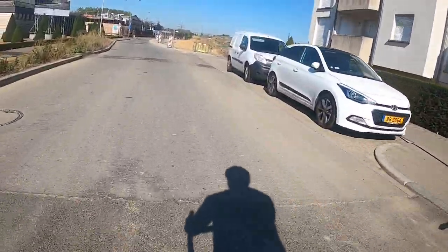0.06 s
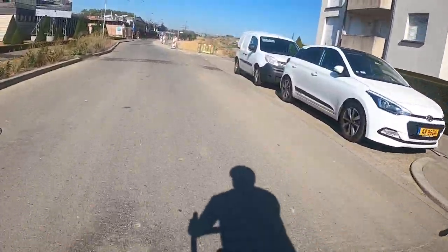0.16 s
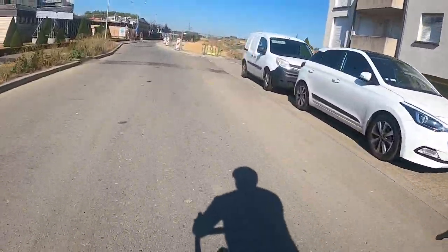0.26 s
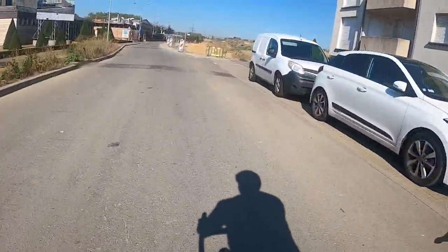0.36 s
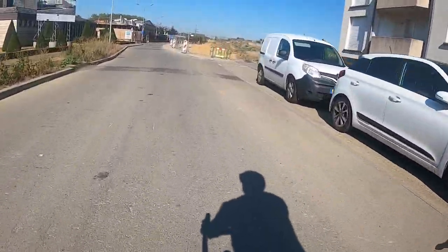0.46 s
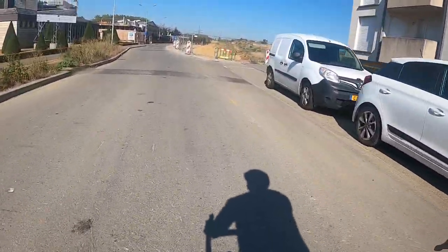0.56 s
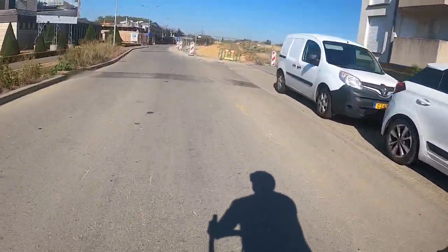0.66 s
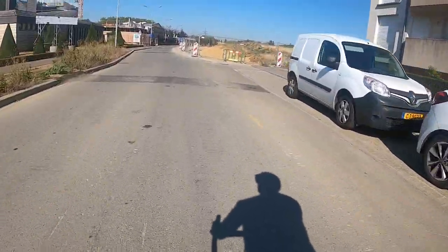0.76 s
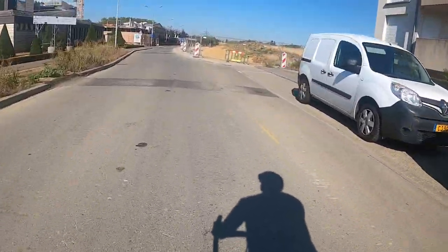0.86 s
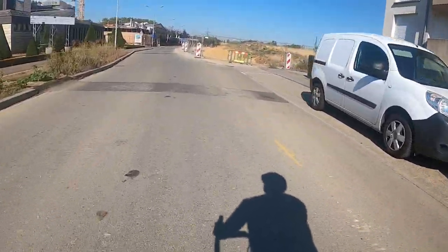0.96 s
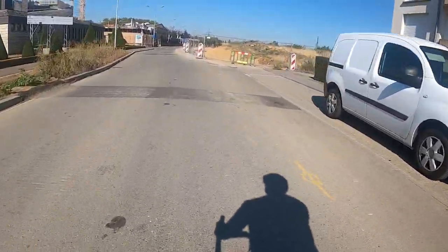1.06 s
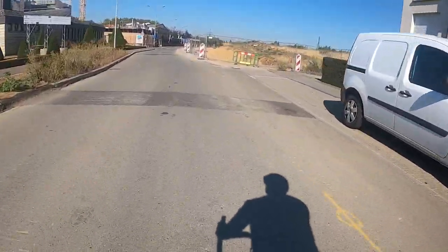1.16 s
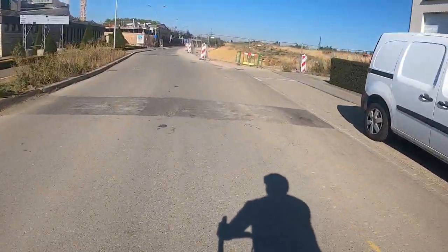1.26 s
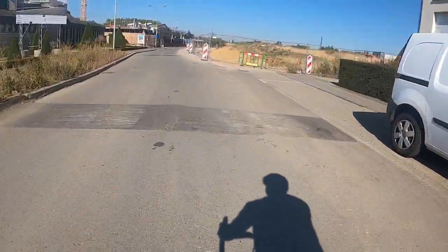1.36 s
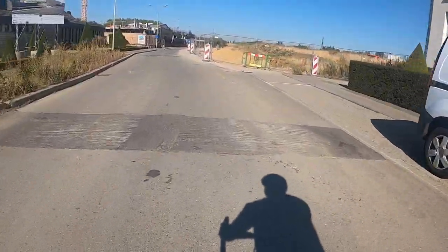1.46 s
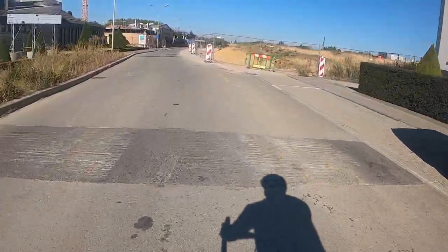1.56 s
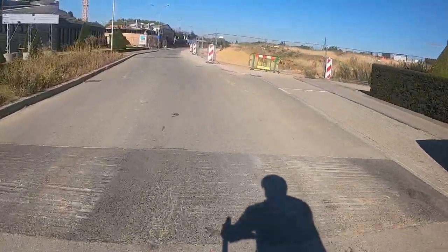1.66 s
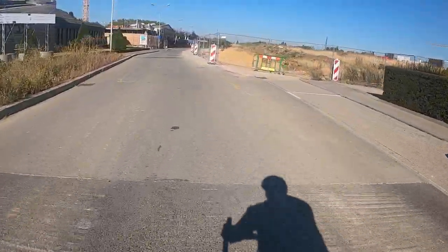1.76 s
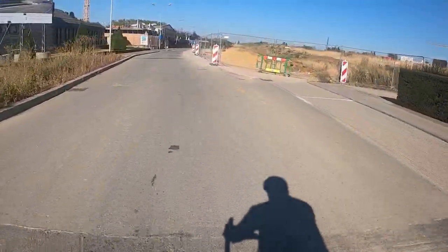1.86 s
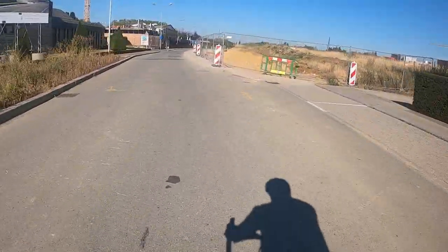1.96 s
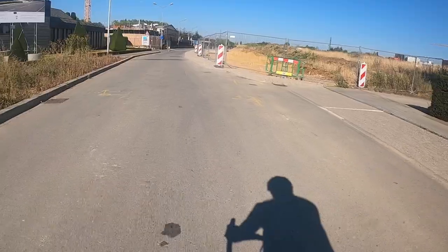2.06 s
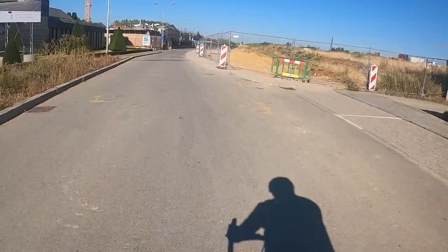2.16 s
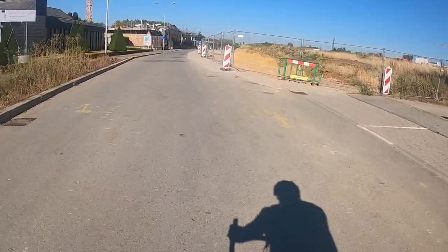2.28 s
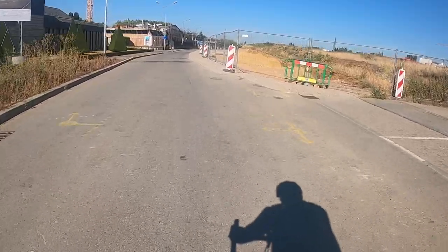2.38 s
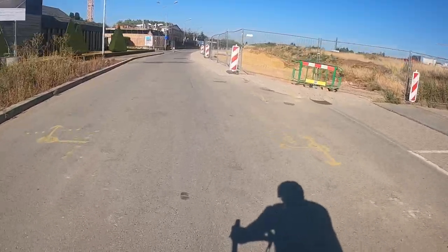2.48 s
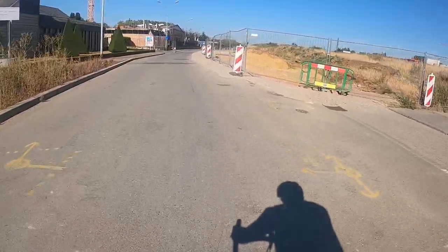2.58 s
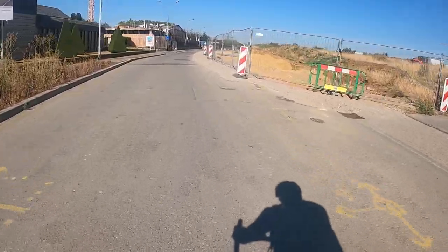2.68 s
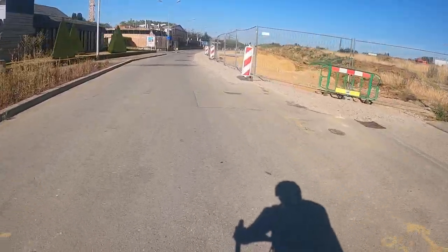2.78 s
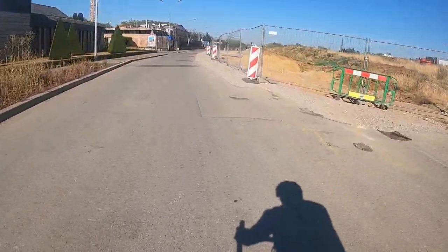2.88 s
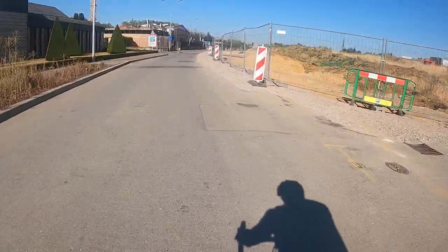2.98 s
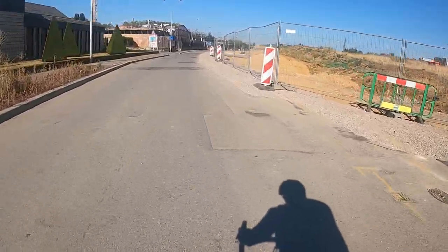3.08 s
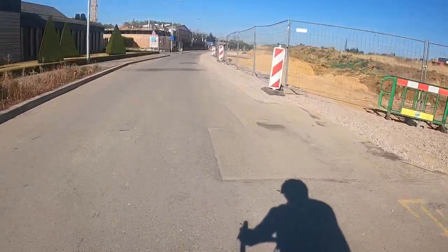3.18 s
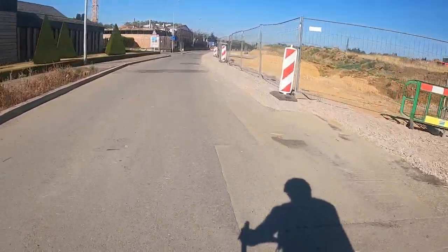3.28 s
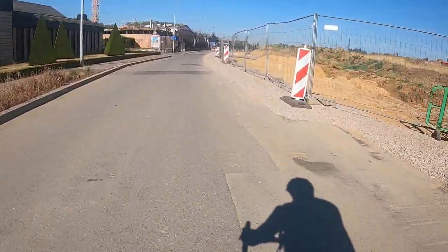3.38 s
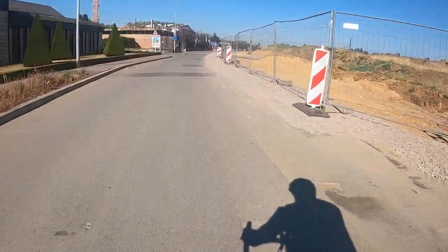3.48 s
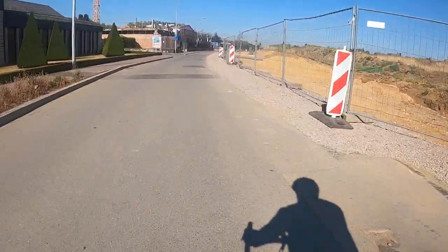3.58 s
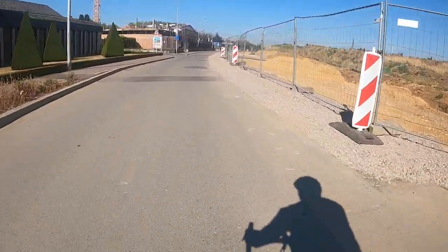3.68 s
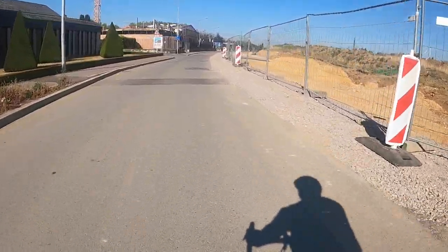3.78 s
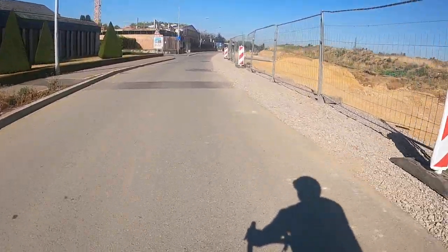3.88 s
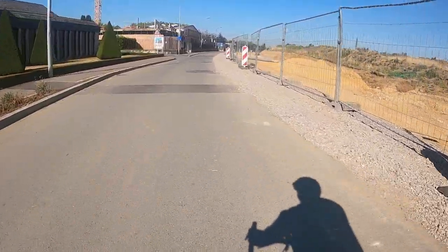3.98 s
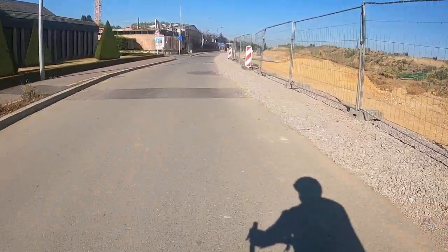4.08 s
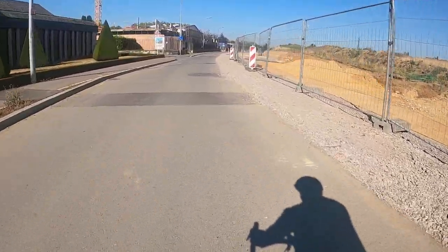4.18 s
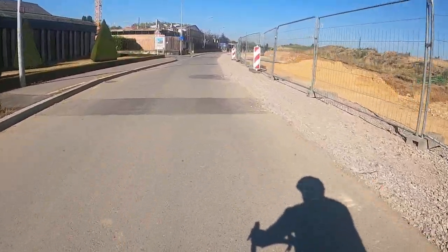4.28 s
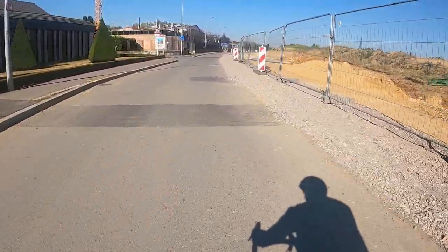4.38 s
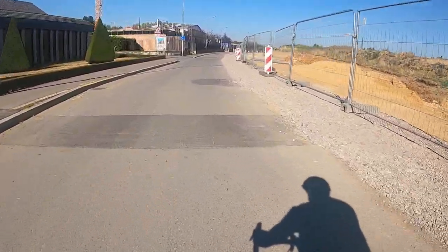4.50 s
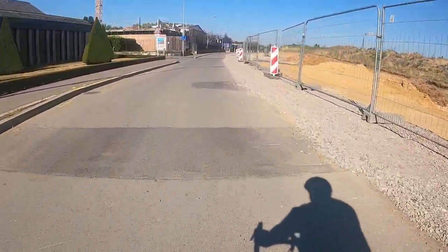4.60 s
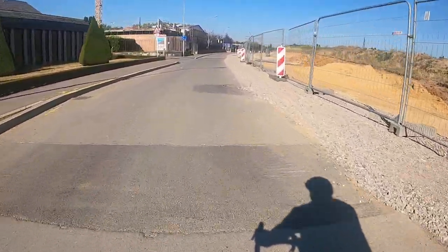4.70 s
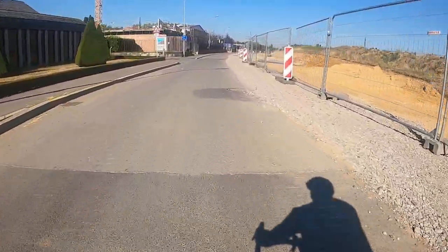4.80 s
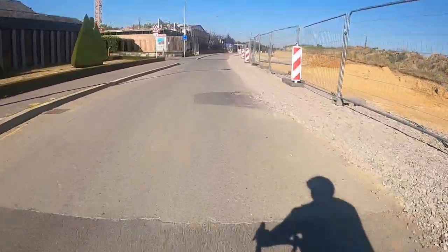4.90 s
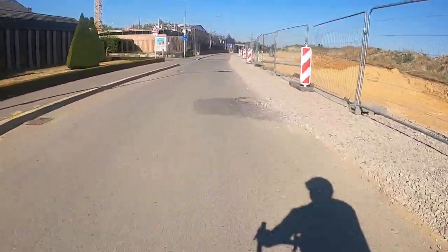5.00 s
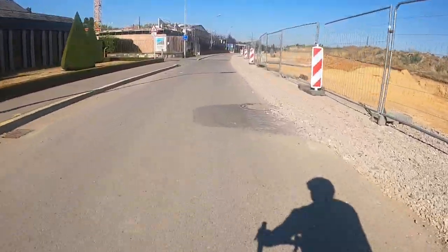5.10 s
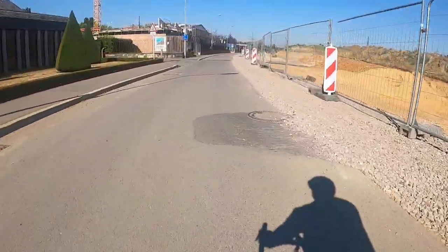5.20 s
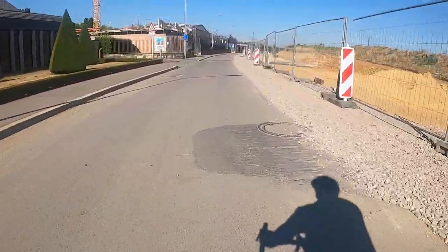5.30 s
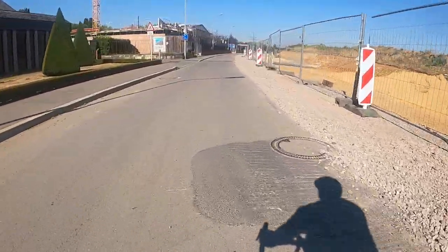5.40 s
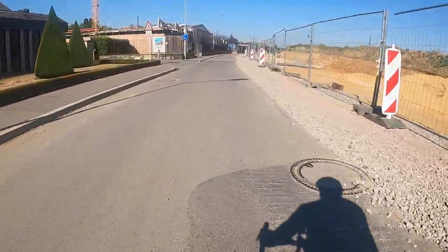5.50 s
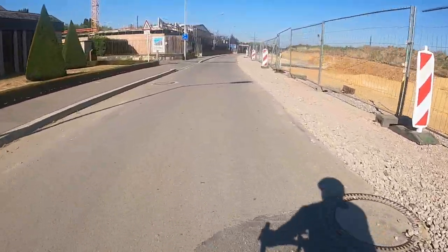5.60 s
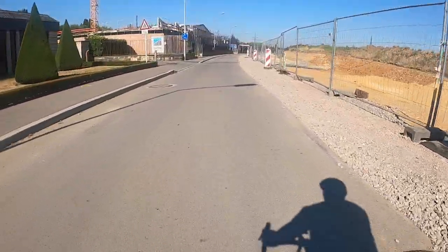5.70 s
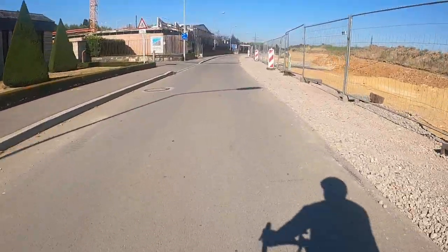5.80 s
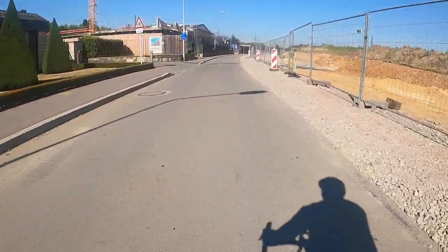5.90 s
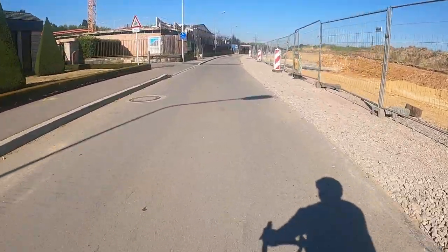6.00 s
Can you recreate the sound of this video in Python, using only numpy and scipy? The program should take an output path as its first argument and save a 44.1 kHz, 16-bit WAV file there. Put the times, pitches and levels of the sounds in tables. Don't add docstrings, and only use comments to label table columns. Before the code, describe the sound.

Bicycle rolls along asphalt with heavy low wind rumble and tyre drone, a hard rattling bump early and another near five seconds.

```python
import sys
import numpy as np
from scipy import signal
from scipy.fft import rfft, irfft
from scipy.io import wavfile

SR = 44100
rng = np.random.default_rng(int(sys.argv[2]) if len(sys.argv) > 2 else 0)


def invert_db(level):
    return 10 ** (np.asarray(level, dtype=float) / 20)


def master_out(mix):
    frames = np.transpose(np.atleast_2d(mix))
    ceiling = np.clip(frames, -1, 1)
    pcm = np.round(ceiling * 32767).astype(np.int16)
    wavfile.write(sys.argv[1], SR, pcm)


N = 266805
TIME = np.arange(N) / SR

# (time [s], pitch [Hz])
FORK_PITCH = [(0, 46.23), (.3, 40), (.65, 34.1), (.9, 40), (1.6, 40.88), (1.8, 36.46), (3.95, 37.28),
              (4.1, 41.31), (5.1, 38.69), (5.26, 34.9), (5.4, 39.83), (5.8, 36), (6.05, 45.1)]
# (time of widest swing [s], level [dB])
KICKS = [(.05, -27), (0.299, -17), (.52, -22), (.86, -22.5), (1.118, -17), (1.271, -22), (1.55, -25.5),
         (1.79, -27), (1.919, -23), (2.07, -17), (2.222, -16.5), (2.399, -18.5), (2.66, -23), (2.75, -30),
         (3.079, -23.5), (3.37, -18.5), (3.55, -26), (3.7, -22), (3.94, -23.5), (4.079, -33), (4.24, -22),
         (4.42, -23), (4.73, -26), (5.063, -20.5), (5.26, -13.5), (5.39, -17), (5.52, -20.5), (5.8, -19),
         (5.932, -19.5)]
KICK_RISE_S, KICK_FALL_S, FORK_REST_DB = 0.073, 0.12, -43

# (time [s], level [dB])
WIND = [(0, -22), (.5, -19.5), (.65, -23.5), (1.25, -30.5), (1.7, -22.5), (2.0, -21), (2.3, -30),
        (2.8, -20.5), (3.15, -25), (3.32, -25.5), (3.6, -20.5), (3.9, -37), (4.1, -24.5), (4.9, -33),
        (5.2, -29.5), (5.5, -30), (5.78, -23), (6.05, -31.5)]
# (frequency [Hz], density [dB per Hz])
WIND_COLOUR = [(12, -19), (22, -3.5), (38, 3.5), (60, 2), (86, 1.5), (110, -5.5), (160, -11.5),
               (230, -32.5), (400, -35.5)]
# (time [s], level [dB])
EDDY_SPELLS = [
    (.5, -27),
    (2.75, -26),
    (4.05, -27),
    (4.25, -24),
    (4.4, -25),
    (4.7, -24),
    (5.4, -35),
]
GUST_DB, GUSTS_PER_S, EDDY_DB = 1.5, 1.9, -0.1
EDDY_RISE_S, EDDY_FALL_S = 0.036, 0.099

# (time [s], pitch [Hz], level [dB], second order against it [dB])
ENGINE = [(0, 84.6, -19.5, -8.5), (.22, 85.43, -23.5, -13), (.3, 84.94, -31, -1), (.4, 85.4, -20.5, -29),
          (.5, 86.63, -29.5, -16), (.62, 87.26, -21.5, -11), (.9, 86.3, -24.5, -13),
          (1.03, 86.76, -33, -14), (1.2, 86.8, -26.5, -24.5), (1.45, 86.76, -23.5, -15),
          (1.7, 88.2, -30, -15), (1.9, 86, -47, -8)]
# (multiple [1], level [dB rms], time loudest [s], time heard [s])
ENGINE_ORDERS = [(3, -42, 1, 0.34), (4, -45, 0.57, 0.5)]
FIRING_WANDER_HZ = 0.1

# (time [s], coarseness [dB], loose dust [dB])
ROAD = [(0, 2.5, 8.5), (.15, 2.5, 3), (.35, -1.5, 3.5), (.64, -3, -4.5), (1.0, -1.5, -2), (1.4, -.5, 1.5),
        (1.93, -0.4, 4), (2.0, 3, 3.5), (2.22, 0.5, 3), (2.32, -2.5, -3), (2.9, -2, -2.5), (3.24, 0.5, -2),
        (3.5, 0, 1.5), (3.85, 2, -1.5), (4.7, 2.5, 1), (5.1, 3.5, -0.5), (5.35, -2.5, -6), (6.05, -2, -6)]
# (frequency [Hz], density [dB per Hz])
DRONE = [(120, -7.5), (200, -0.5), (247, -1.5), (286, -2.5), (318, -1), (420, -2), (560, -17), (730, -41),
         (1230, -120)]
ROAR = [(310, -28), (520, -11.5), (760, -2.5), (981, -7.5), (1130, -6), (1220, -12), (1290, -4),
        (1480, -10), (1590, -11.5), (1900, -17), (2470, -28.5), (4180, -120)]
GRIT = [(1060, -14.5), (1800, -2.5), (2350, -1.5), (2570, -3), (2780, -2.5), (3370, -2), (3690, -6),
        (4220, -6), (5200, -23), (6760, -51), (11400, -120)]
HISS = [(3500, -25), (4900, -0.5), (7000, -9.5), (9500, -16), (11200, -38.5), (15500, -70)]
# (frequency [Hz], width [Hz], level [dB])
TUBES = [(290.8, 33.5, -12), (356.7, 25, -15), (790, 360, -24.5), (1169.6, 41, -11.5), (1318, 11, -18),
         (1480, 38, -12.5), (1620, 27, -24)]
# (frequency [Hz], width [Hz], level [dB])
HOUSING = [(2004, 110, -9), (2590, 170, -8.5), (2980, 340, -11.5), (3290, 290, -12.5), (4236, 380, -11.5)]
ROAR_DB, DRONE_DB, GRIT_DB, HISS_DB = -37.5, -37.5, -50.5, -65.5
DRONE_FOLLOWS, GRIT_FOLLOWS, GRIT_DUST = 1, 0.77, 0.22
GRIT_GROWS_DB_PER_S, DRONE_LUMP_DB = 0.2251, 0.5
ROAR_PATCH_DB, ROAR_PATCHES_PER_S = 1.3, 9
LOW_TUBE_DB, MIDDLE_TUBE_DB, MIDDLE_TUBE_FROM_S, MIDDLE_TUBE_FOR_S = 2.5, 20, 4.09, 0.42
LOW_TUBE_FROM_S, LOW_TUBE_FOR_S, LOW_TUBE_SINGS_DB, DRONE_SINKS_DB = 5.7, 1, 5, -0.5
CARS_ECHO_DB, CARS_LEFT_S = 1.5, 0.78
# (time [s], buzz [dB], frame boom [dB])
JOLTS = [(0.263, -36, -25.5), (0.447, -55, -30), (0.601, -58, -37), (1.46, -62, -34.5), (1.99, -66, -34),
         (2.201, -55, -29), (2.731, -53, -35), (3.241, -74, -32.5), (3.89, -60, -41), (4.36, -81, -53),
         (5.049, -29.5, -28), (5.19, -42, -35.5), (5.27, -47.5, -51), (5.61, -77, -54), (5.769, -40, -34)]
JOLT_RISE_S, BUZZ_FALL_S, BOOM_FALL_S = 0.014, 0.028, 0.054

# (frequency [Hz], width [Hz], level [dB])
CAR_SIDES = [(1040, 65, 0), (1086, 170, 0.0033)]
CAR_SIDES_DB = -39

# (frequency [Hz], density [dB per Hz])
FAR_AIR = [(4500, -13.5), (6000, -2.5), (8500, -9), (11000, -39), (15500, -70.5)]
FAR_AIR_DB = -78

# (time [s], level [dB])
TOP_BLIPS = [(0.1805, -75), (0.221, -69.5), (0.2606, -65.5), (0.3431, -75), (0.8926, -77.5), (1.066, -74),
             (1.2471, -80.5), (1.3084, -80), (1.3726, -82), (1.4232, -82), (1.6427, -85), (1.6711, -80.5),
             (1.714, -81), (1.7424, -88), (1.7724, -78.5), (1.8447, -90), (1.8901, -75), (1.9111, -82.5),
             (2.0208, -89), (2.1929, -89), (2.3406, -81.5), (2.5092, -80), (2.832, -77.5), (3.026, -76.5),
             (3.0634, -78.5), (3.474, -82), (4.0711, -76), (4.1565, -82), (4.2502, -94), (4.3326, -85.5),
             (4.5421, -89), (5.018, -67.5), (5.0454, -62), (5.1677, -80.5), (5.2425, -76), (5.474, -83),
             (5.7668, -70.5), (5.7892, -75), (5.8661, -82), (5.9115, -78)]
BLIP_DB, BLIP_CUT_HZ = 9, 10500
# (frequency [Hz], density [dB per Hz])
TOP_AIR = [(9000, -14), (10300, -2), (12000, -7), (14000, -26)]
TOP_AIR_DB, TOP_AIR_SWING_DB, TOP_AIR_FOLLOWS = -92.5, 5, 1.3

# (time [s], peak [dB], middle ring against it [dB], low clank against it [dB])
TICKS = [(0.2213, -33.5, -14, -8), (0.247, -34, 7, 6), (0.2617, -31.5, 1.5, 10), (0.276, -37.5, 2, 17),
         (0.312, -54, 8, 17), (0.431, -51, 14.5, 6), (1.053, -52, 8, 24.5), (1.9702, -58, 10, 35),
         (2.088, -43, 4, 12), (2.2204, -51, 6, 12), (2.362, -47, 13, 18), (2.391, -48.5, 15.5, 5),
         (5.019, -33, 2, 2), (5.033, -37, 16, 10), (5.0476, -27, 6, 19), (5.0513, -34, 4, 8),
         (5.065, -33.5, 12, 15), (5.076, -44.5, 18.5, -3), (5.103, -43, 7, 0), (5.1295, -42, 4, 8),
         (5.181, -39.5, 10.5, 0), (5.1915, -42, 11, 2), (5.202, -36.5, 1.5, -3), (5.2422, -37.5, 8, -2),
         (5.2663, -43, 9, 0), (5.294, -45.5, 6, 17), (5.387, -56, 15, -3), (5.7664, -39, 8, 7),
         (5.791, -36, 2, 7), (6.032, -40.5, -7, -5)]
# (time [s], peak [dB], middle ring against it [dB])
MORE_TICKS = [(0.288, -37.5, -4), (.3388, -52, 3), (0.388, -48, -8), (0.441, -46, -7), (2.074, -61, 6),
              (2.3484, -56, 16), (3.8057, -56.5, 23), (5.0413, -26, -2), (5.083, -57, 13), (5.099, -49, 15),
              (5.2727, -55, 6), (5.398, -50, 6), (5.744, -51.5, 15.5), (5.753, -49, 19), (5.781, -46, 3),
              (5.8164, -56.5, 19), (5.841, -62, 18), (5.9184, -53, 9), (5.9405, -56, 10), (5.883, -53, 3)]
# (frequency [Hz], level [dB], t60 [s])
SHARP = [(5090, 6, 0.005), (6100, -0.5, 0.0073), (6560, -1, 0.0064), (7500, -8.5, 0.0086),
         (7720, -0.5, 0.01), (8900, -6.5, .006), (9300, -7.5, 0.0046), (10100, -25.5, .005),
         (12000, -30.5, .004)]
MIDDLE = [(2770, -9, 0.027), (3000, 0.5, 0.01), (3510, 1, 0.0072), (3600, 3.5, 0.0081), (4000, 5.5, 0.0087),
          (4430, 4.5, 0.0032)]
CLANK = [(1250, 10, 0.0033), (1770, 0.5, 0.016), (1860, -1.5, 0.0074), (2420, -12, 0.035)]
# (frequency [Hz], density [dB per Hz])
SHAKE_COLOUR = [(530, -34), (900, 4), (948, -1.5), (1260, -1.5), (1460, -15.5), (1930, -4.5), (2180, -3),
                (3770, -8), (7830, -20.5), (10600, -31.5), (13700, -70), (22000, -120)]
MORE_TICKS_CLANK_DB, TICK_SPREAD_DB, PORT_CUT_HZ = 14.5, 2, 11000
LOOSE_PER_S, LOOSE_BELOW_DB, LOOSE_LINGER_S = 49, 9, 0.025
STRONGEST_CLANK_DB, STRONGEST_KNOCK_DB = -15, -10
TICK_S, CLANK_S, KNOCK_S, FLICK_S = .00085, .003, .00025, .00003

# (time [s], tyre thud [dB], rim ring [dB], spoke knock [dB])
BUMPS = [(0.244, -27, -28, -16), (0.261, -8, -22, -10), (0.268, -8, -19, -9), (0.44, -13, -21.5, -31),
         (0.46, -9, -39.5, -28.5), (1.933, -19, -17, -33), (1.959, -21, -20, -27), (1.97, -24, -16, -24),
         (1.99, -19, -10, -40), (2.025, -14, -12, -28), (2.042, -41, -9, -30), (2.055, -32, -19, -27),
         (2.097, -27, -19, -33), (2.149, -29, -10, -26), (2.174, -23, -25, -34), (2.19, -42, -21, -15),
         (2.21, -26, -25, -26), (2.235, -20, -20, -31), (2.334, -25, -20.5, -19), (2.379, -15, -21, -33),
         (2.645, -16, -38, -32), (2.709, -23, -33, -29), (2.731, -27, -21, -16), (2.82, -15.5, -33, -35),
         (3.294, -27, -9, -28), (3.405, -32, -34, -31), (3.881, -33, -25, -29), (4.63, -20, -12.5, -17.5),
         (5.023, -20, -22, -9), (5.033, -20, -13, -6), (5.05, -14, -16, -16), (5.063, -13, -19, -10),
         (5.074, -7, -23, -8), (5.082, -18, -14, -12), (5.11, -19, -17, -31), (5.173, -18, -31, -17),
         (5.207, -23, -20, -10), (5.258, -20, -12, -16), (5.28, -16.5, -17, -29), (5.37, -23, -23.5, -33),
         (5.602, -30, -35, -33), (5.668, -28, -30, -36), (5.684, -23, -17, -28), (5.746, -17.5, -17, -13),
         (5.757, -24, -25.5, -12), (5.764, -15, -28, -19), (5.891, -25, -24, -19), (5.971, -34, -30, -37)]
# (frequency [Hz], level [dB], t60 [s])
WHEEL = [(125, 5, 0.082), (184, 4, 0.069), (285.3, -2, 0.11), (451, -2.5, 0.025), (570, 6, 0.017)]

# (time [s], low ring [dB], high ring [dB])
STAY_KNOCKS = [(.26, -26, -34), (1.97, -28, -44), (1.982, -24, -44), (1.992, -28, -44), (2.05, -29, -46),
               (5.034, -24, -32), (5.043, -38, -32), (5.051, -32, -17), (5.066, -21, -32),
               (5.111, -38, -44), (5.184, -29, -40), (5.746, -30, -43), (5.766, -33, -39),
               (5.793, -34, -42)]
# (frequency [Hz], level [dB], t60 [s])
STAY = [(1310, 4.5, 0.022), (1450, -6.5, 0.062), (1960, 10, .025)]
# (time [s], level [dB])
RIM_KNOCKS = [(.262, -24), (1.975, -19), (1.997, -27), (2.03, -24), (2.051, -19), (2.152, -26),
              (2.192, -24), (2.232, -25), (2.337, -27), (2.728, -22), (5.026, -21), (5.071, -15),
              (5.12, -26), (5.747, -25), (5.768, -26), (5.795, -24), (5.039, -15.5), (5.058, -23),
              (5.088, -16.5), (5.099, -27), (5.208, -16), (5.259, -20), (5.605, -18), (5.67, -35),
              (5.688, -25), (5.76, -18)]
# (frequency [Hz], level [dB], t60 [s])
RIM = [(283, -1, 0.05), (412, -10, 0.023), (650, -6, .02)]

# (time [s], low ring [dB], high ring [dB])
FLICKS = [(.262, -30, -40), (.298, -44, -52), (.313, -46, -36), (.432, -44, -42), (1.053, -52, -44),
          (1.968, -46, -38), (1.975, -43, -42), (2.074, -52, -34), (2.079, -52, -38), (2.089, -52, -46),
          (5.031, -30, -33), (5.082, -38, -25), (5.191, -32, -46), (5.205, -46, -43), (5.246, -36, -42),
          (5.387, -46, -35), (5.745, -43, -36), (5.753, -42, -38), (5.768, -33, -44)]
# (frequency [Hz], level [dB], t60 [s])
CATCH = [(3350, 3.5, 0.029), (3890, 0, 0.027), (4350, -0.5, 0.02), (4850, -12, 0.0085)]

# (time [s], level [dB])
FLUTTERS = [
    (.48, -23.5),
    (1.0, -34),
    (1.72, -31.5),
    (2.75, -29),
    (4.08, -31),
    (4.16, -34),
    (4.24, -36),
    (4.4, -39),
    (5.4, -33.5),
    (5.78, -34),
]
# (frequency [Hz], width [Hz], level [dB])
FLUTTER = [(101.5, 50, 0.0085)]
FLUTTER_RISE_S, FLUTTER_FALL_S = 0.028, 0.063


def rms_one(x):
    return x / np.sqrt(np.mean(x ** 2) + 1e-20)


def in_time(rows):
    s, *columns = np.transpose(rows)
    return [np.interp(TIME, s, c) for c in columns]


def drift(rate):
    r = np.exp(-80 * np.pi * rate / SR)
    slow = signal.lfilter([1], [1, -2 * r, r * r], rng.standard_normal(N // 40 + 2002))
    slow = rms_one(slow[2000:])
    return np.interp(np.arange(N) / 40, np.arange(len(slow)), slow)


def coloured(spectrum, patchy_db, rate, count=4):
    at, level = np.transpose(spectrum)
    log_hz = np.log(np.arange(1, N // 2 + 2) * SR / N)
    shape = rfft(rng.standard_normal(N)) * invert_db(np.interp(log_hz, np.log(at), level, -120, -120))
    place = np.clip((log_hz - np.log(at[0])) / np.log(at[-1] / at[0]), 0, 1) * (count - 1)
    together = drift(rate)
    out = 0
    for k in range(count):
        band = irfft(shape * np.clip(1 - abs(place - k), 0, 1), N)
        out = out + band * invert_db(patchy_db * (0.45 * together + drift(rate)))
    return rms_one(out)


def resonances(modes):
    out = 0
    for hz, width, level_db in modes:
        r = np.exp(-np.pi * width / SR)
        peak = [1, 0, -1, 1, -2 * r * np.cos(2 * np.pi * hz / SR), r * r]
        out = out + invert_db(level_db) * rms_one(signal.sosfilt([peak, peak], rng.standard_normal(N)))
    return out


def struck(times, levels_db, modes, spread_db, chatter_s, grainy=1):
    fall = np.exp(-1 / (chatter_s * SR))
    at = ((np.array(times) - chatter_s) * SR).astype(int)
    out = np.zeros(N)
    chance_db = spread_db * rng.standard_normal((len(at), len(modes)))
    strength = np.reshape(levels_db, (len(at), -1)) + chance_db
    grain = rng.standard_normal(N + 997 * len(modes))
    for k, (hz, level_db, t60) in enumerate(modes):
        clicks = np.full(N, 1e-18)
        clicks[at] = invert_db(strength[:, k] + level_db)
        push = signal.lfilter([1], [1, -2 * fall, fall ** 2], clicks)
        if grainy:
            push *= 2 * (1 - fall) ** 1.5 * grain[997 * k:][:N]
        else:
            push *= (1 - fall) ** 2
        r = invert_db(-60 / (t60 * SR))
        w = 2 * np.pi * hz / SR
        out += signal.lfilter([0, np.sin(w)], [1, -2 * r * np.cos(w), r * r], push)
    return out


def dull(x, cut_hz, order=2):
    return signal.sosfilt(signal.butter(order, min(cut_hz, 20000), fs=SR, output="sos"), x)


def swells(times, levels_db, rise_s, fall_s):
    coarse_time = TIME[::32]
    late = coarse_time[:, None] - times
    shape = np.where(late < 0, np.exp(-(late / rise_s) ** 2), np.exp(-2 * np.abs(late) / fall_s))
    return np.interp(TIME, coarse_time, np.sqrt(shape @ invert_db(2 * levels_db)))


def fork():
    pitch = in_time(FORK_PITCH)[0] + 2.763 * drift(7.02)
    swing = np.sqrt(2) * np.sin(2 * np.pi * np.cumsum(pitch) / SR)
    size = invert_db(FORK_REST_DB) + swells(*np.transpose(KICKS), KICK_RISE_S, KICK_FALL_S)
    return size * (invert_db(0.5 * drift(5.4)) * swing + resonances([(40, 27.0, -9.0)]))


def wind():
    lumps = coloured(WIND_COLOUR, patchy_db=2.5, rate=11.0)
    slow = dull(lumps, cut_hz=79, order=1)
    gust = invert_db(in_time(WIND)[0] + GUST_DB * drift(GUSTS_PER_S))
    spells = swells(*np.transpose(EDDY_SPELLS), EDDY_RISE_S, EDDY_FALL_S)
    eddies = np.hypot(invert_db(EDDY_DB) * gust, spells)
    return gust * slow + eddies * (lumps - slow)


def engine():
    pitch, level_db, second_db = in_time(ENGINE)
    phase = 2 * np.pi * np.cumsum(pitch + FIRING_WANDER_HZ * drift(1.9)) / SR
    fade = np.clip((1.95 - TIME) / 0.28, 0, 1)
    higher = 0
    for multiple, order_db, loudest_s, span_s in ENGINE_ORDERS:
        gap = np.exp(-((TIME - loudest_s) / span_s) ** 2)
        higher = higher + invert_db(order_db) * gap * np.sin(round(multiple) * phase)
    firing = invert_db(level_db) * (np.sin(phase) + invert_db(second_db) * np.sin(2 * phase))
    return np.sqrt(2) * fade * (firing + higher)


def tyre():
    coarse, dust = in_time(ROAD)
    jolt_s, _, boom_db = np.transpose(JOLTS)
    smooth = np.exp(-((TIME - LOW_TUBE_FROM_S) / LOW_TUBE_FOR_S) ** 2)
    singing = invert_db(MIDDLE_TUBE_DB) * np.exp(-((TIME - MIDDLE_TUBE_FROM_S) / MIDDLE_TUBE_FOR_S) ** 2)
    cars_echo = invert_db(CARS_ECHO_DB * np.exp(-TIME / CARS_LEFT_S))

    drone = invert_db(-DRONE_SINKS_DB * smooth) * coloured(DRONE, patchy_db=1.5, rate=26.0)
    drone += invert_db(LOW_TUBE_DB + LOW_TUBE_SINGS_DB * smooth) * resonances(TUBES[:2])
    roar = coloured(ROAR, ROAR_PATCH_DB, ROAR_PATCHES_PER_S)
    roar += (1 + singing) * resonances(TUBES[2:3])
    roar += cars_echo * resonances(TUBES[3:5]) + resonances(TUBES[5:])
    grit = coloured(GRIT, patchy_db=1.76, rate=20.0) + resonances(HOUSING)
    hiss = coloured(HISS, patchy_db=1.0, rate=37.0)

    rolling = invert_db(DRONE_DB + DRONE_FOLLOWS * coarse + DRONE_LUMP_DB * drift(2.6))
    drone_gain = np.hypot(rolling, swells(jolt_s, boom_db, 2 * JOLT_RISE_S, BOOM_FALL_S))
    grit_db = GRIT_DB + GRIT_FOLLOWS * coarse + GRIT_DUST * dust + GRIT_GROWS_DB_PER_S * TIME
    low = drone_gain * drone + invert_db(ROAR_DB + coarse) * roar
    return low + invert_db(grit_db) * grit + invert_db(HISS_DB + dust) * hiss


def car_sides():
    return invert_db(CAR_SIDES_DB) * np.exp(-TIME / 0.56) * resonances(CAR_SIDES)


def street_air():
    return invert_db(FAR_AIR_DB) * coloured(FAR_AIR, patchy_db=-1.0, rate=12.0, count=2)


def top_treble():
    s, level_db = np.transpose(TOP_BLIPS)
    blips = swells(s, level_db + BLIP_DB, .002, .004) * rng.standard_normal(N)
    blips = signal.sosfilt(signal.butter(6, BLIP_CUT_HZ, "high", fs=SR, output="sos"), blips)
    blips = dull(blips, cut_hz=12000)
    dust_db = TOP_AIR_FOLLOWS * in_time(ROAD)[1] + TOP_AIR_SWING_DB * drift(4.0)
    return blips + invert_db(TOP_AIR_DB + dust_db) * coloured(TOP_AIR, patchy_db=-0.5, rate=12.0, count=2)


def after_ticks():
    rows = []
    for s, buzz_db, _ in JOLTS:
        gap, size, middle, clank = rng.random((4, 5))
        late = np.cumsum(2 * gap / LOOSE_PER_S)
        level_db = buzz_db / 2 - 23.5 - LOOSE_BELOW_DB * size - 24.0 * late / LOOSE_LINGER_S
        rows += list(zip(s + late, level_db, 14 * middle, 18 * clank))
    return rows


def rattle():
    more_ticks = [(*tap, MORE_TICKS_CLANK_DB) for tap in MORE_TICKS]
    s, sharp_db, middle_db, clank_db = np.transpose(TICKS + after_ticks() + more_ticks)
    clank_db = np.minimum(sharp_db + clank_db, STRONGEST_CLANK_DB)
    sharp = struck(s, sharp_db - 8.0, SHARP, TICK_SPREAD_DB, TICK_S)
    middle = struck(s, sharp_db + middle_db - 8.0, MIDDLE, spread_db=-5.0, chatter_s=2 * TICK_S)
    clank = struck(s, clank_db - 7.5, CLANK, TICK_SPREAD_DB, CLANK_S)
    ticks = sharp + dull(middle, cut_hz=7300) + dull(clank, cut_hz=2650)
    jolt_s, buzz_db, _ = np.transpose(JOLTS)
    shaking = coloured(SHAKE_COLOUR, patchy_db=0.0, rate=78.0)
    buzz = swells(jolt_s, buzz_db, JOLT_RISE_S, BUZZ_FALL_S) * shaking
    return dull(ticks, PORT_CUT_HZ, order=4) + buzz


def bumps():
    s, thud, ring, knock = np.transpose(BUMPS)
    level_db = np.transpose([thud, thud, ring, knock, knock])
    level_db = np.minimum(level_db, STRONGEST_KNOCK_DB) - 12.0
    return struck(s, level_db, WHEEL, spread_db=4.0, chatter_s=KNOCK_S, grainy=0)


def stay_and_rim():
    s, low, high = np.transpose(STAY_KNOCKS)
    stay_db = np.transpose([low, low, high])
    stay = struck(s, stay_db, STAY, spread_db=1.0, chatter_s=FLICK_S, grainy=0)
    rim = struck(*np.transpose(RIM_KNOCKS), RIM, spread_db=1.0, chatter_s=KNOCK_S, grainy=0)
    return dull(stay, cut_hz=1300) + rim


def spring_catch():
    s, low, high = np.transpose(FLICKS)
    level_db = np.transpose([low, high, high, high])
    pings = struck(s, level_db, CATCH, spread_db=0.5, chatter_s=FLICK_S, grainy=0)
    return dull(pings, cut_hz=6400, order=4)


def cables():
    return swells(*np.transpose(FLUTTERS), FLUTTER_RISE_S, FLUTTER_FALL_S) * resonances(FLUTTER)


def scene():
    steady = fork() + wind() + engine() + tyre() + car_sides() + street_air() + top_treble()
    knocks = rattle() + bumps() + stay_and_rim() + spring_catch()
    return (steady + knocks + cables())[None]


def low_pass(x):
    return signal.sosfilt(signal.butter(12, 15400, fs=SR, output="sos"), x)


def record(dry):
    limit = .55
    mix = limit * np.tanh(dry / limit) - .0001
    return low_pass(mix)


dry = scene()
out = record(dry)
master_out(out)
```